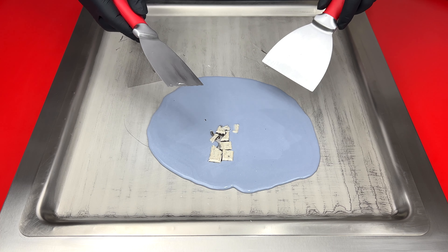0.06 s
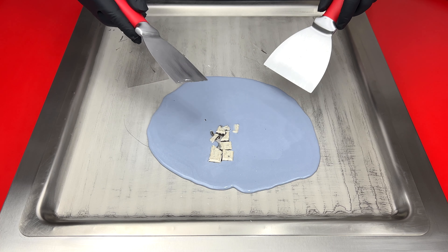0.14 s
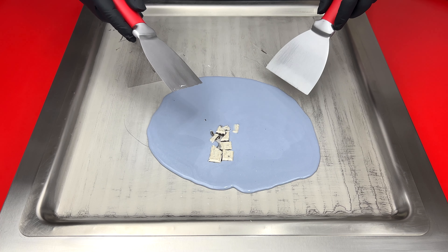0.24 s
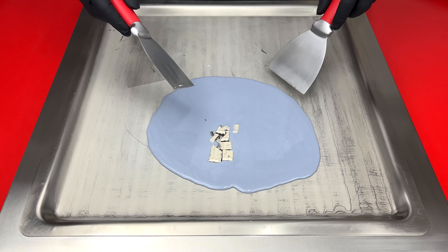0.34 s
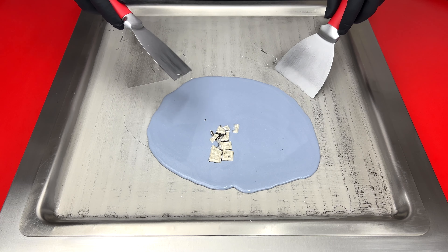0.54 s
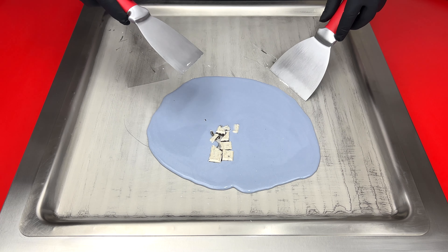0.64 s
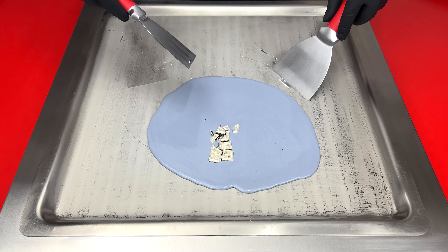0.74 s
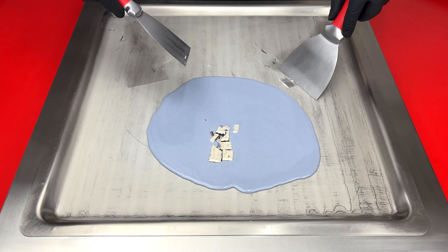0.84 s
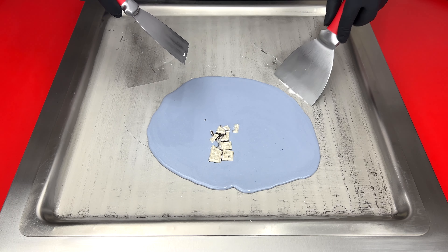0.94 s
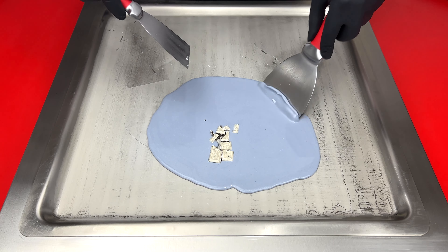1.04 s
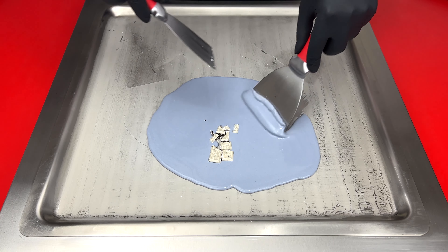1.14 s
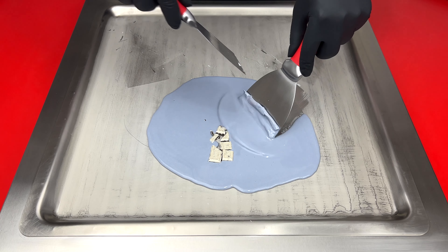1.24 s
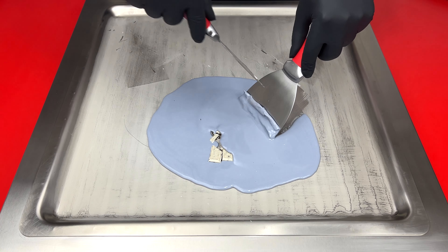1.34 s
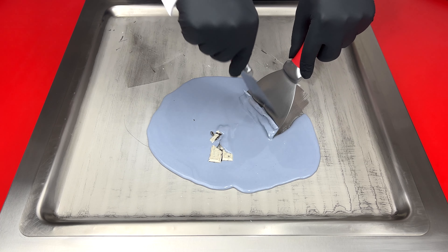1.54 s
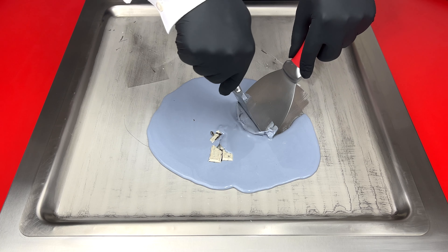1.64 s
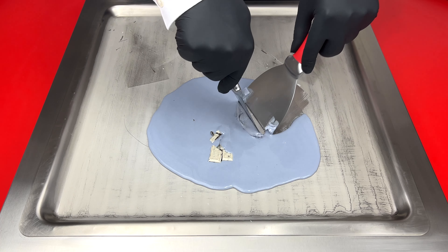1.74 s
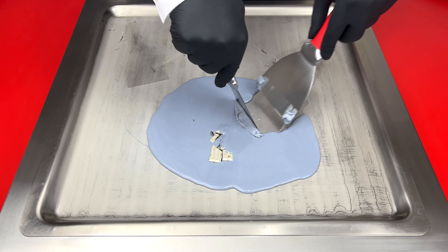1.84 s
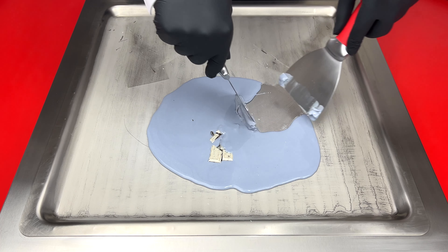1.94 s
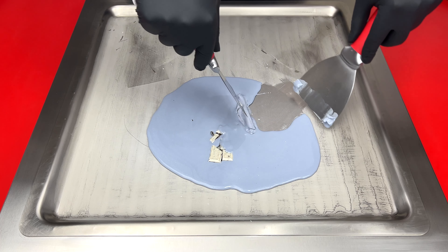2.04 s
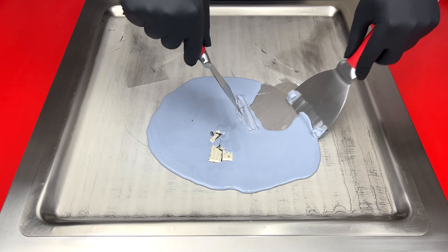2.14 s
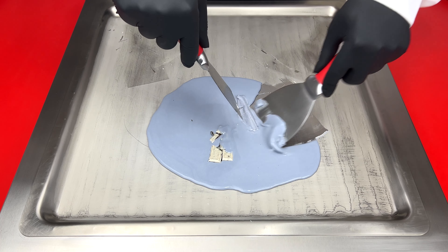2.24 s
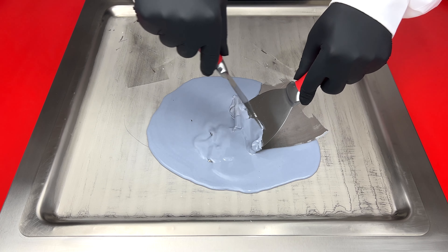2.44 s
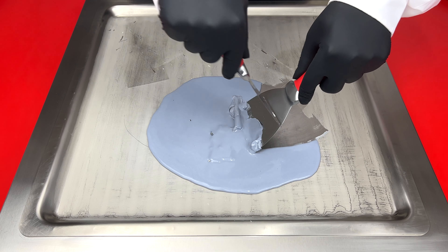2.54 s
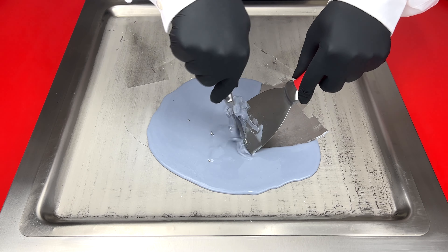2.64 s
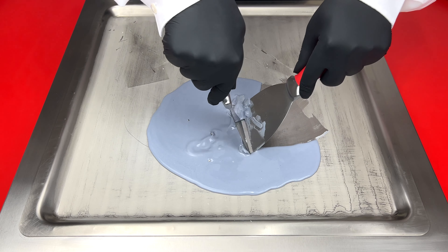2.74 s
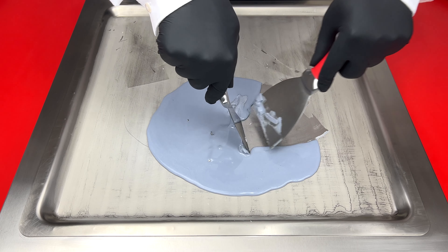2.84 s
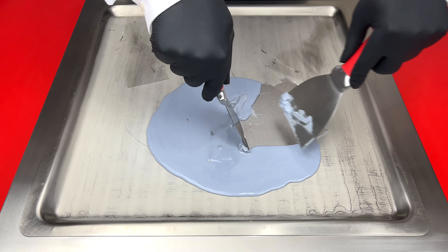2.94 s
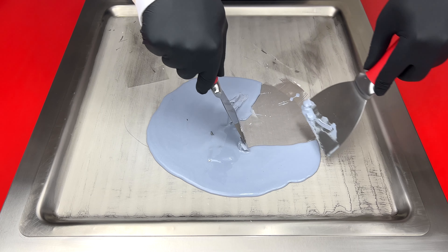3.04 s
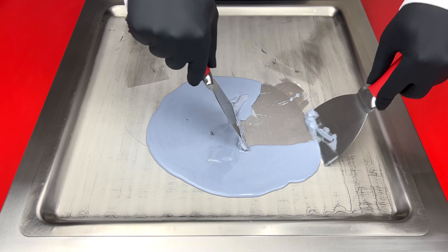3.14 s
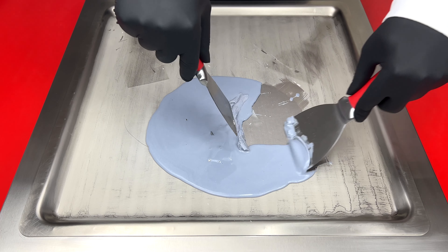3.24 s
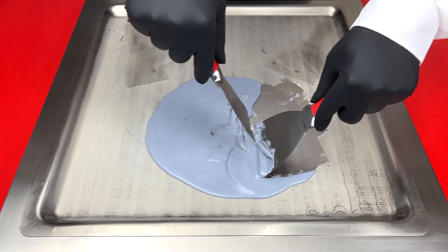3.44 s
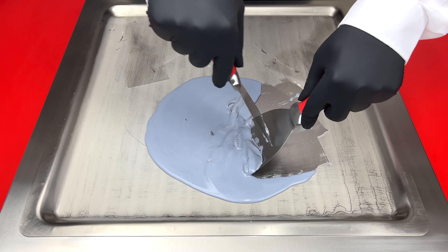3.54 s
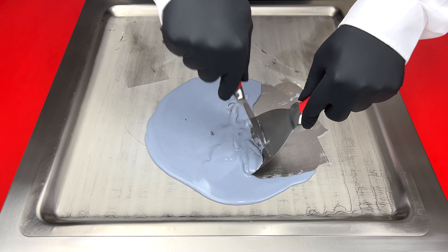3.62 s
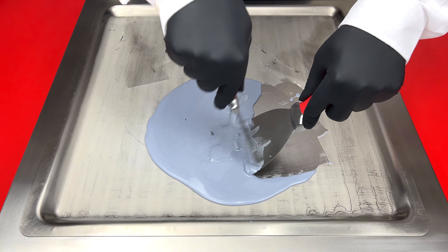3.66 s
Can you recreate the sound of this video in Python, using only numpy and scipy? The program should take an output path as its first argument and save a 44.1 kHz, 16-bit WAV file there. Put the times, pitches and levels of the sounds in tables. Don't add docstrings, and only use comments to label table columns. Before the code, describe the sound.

Two steel spatulas work on a frozen metal plate. Soft taps and thin icy scrapes come first, then hard, irregular chops crack and knock the plate, leaving blades ringing briefly. A dull cabinet thump comes early, and bright blade-on-blade clinks come later. After a pause, a last tap and scrape. A fan roar, throbbing low hum and faint whine run throughout. Close stereo microphone, indoors.

```python
import sys
import numpy as np
from scipy import signal
from scipy.fft import rfft, irfft
from scipy.io import wavfile
from scipy.ndimage import uniform_filter1d

SR = 44100
rng = np.random.default_rng(int(sys.argv[2]) if len(sys.argv) > 2 else 0)


def voltage_ratio(level):
    return 10 ** (np.asarray(level, float) / 20)


def master_out(mix):
    frames = np.transpose(np.atleast_2d(mix))
    ceiling = np.clip(frames, -1, 1)
    pcm = np.round(ceiling * 32767).astype(np.int16)
    wavfile.write(sys.argv[1], SR, pcm)


N = 373086
LAG_SAMPLES = 11


def on_hz(table, hz):
    f, v = np.transpose(table)
    return np.interp(np.log(np.maximum(hz, 1)), np.log(f), v)


def unit(x):
    return x / np.sqrt(np.mean(x ** 2))


def colour(x, table):
    n = x.shape[-1]
    gain = voltage_ratio(on_hz(table, np.fft.rfftfreq(n, 1 / SR)))
    return irfft(rfft(x) * gain, n)


def streaked(x, depth_db, width_hz):
    n = x.shape[-1]
    k = int(width_hz * n / SR)
    steps = np.repeat(rng.standard_normal(n // 2 // k + 1), k)
    ridges = uniform_filter1d(steps, k)[:n // 2 + 1]
    return unit(irfft(rfft(x) * voltage_ratio(depth_db * ridges), n))


def walk(rate):
    k = int(SR / rate)
    return uniform_filter1d(np.repeat(rng.standard_normal(N // k + 1), k), k)[:N]


def later(hz):
    return hz * LAG_SAMPLES / SR


def two_sided(mid, side, alike):
    alike = np.clip(alike, -.99, .99)
    return np.sqrt(1 + alike) * mid + np.sqrt(1 - alike) * side * np.array([[1], [-1]])


def add_at(out, start_s, sound):
    i = int(start_s * SR)
    room = out[:, i:i + sound.shape[1]]
    room += sound[:, :room.shape[1]]


# pitch_hz, level_db
HISS = [(7000, -13.5), (8800, -6.5), (9800, -2.5), (10800, -3), (11800, -3.5), (12800, -10.5), (14500, -6),
        (16500, -10)]
# pitch_hz, level_db
RASP = [(900, -6.5), (1500, 3.5), (2500, -1.5), (3500, -5), (4700, -4), (5200, -2), (5800, -0.5),
        (6400, -1), (7700, -8.5), (9000, -11.5), (10000, -47)]
# pitch_hz, level_db
THUD = [(150, -20), (300, -20), (900, 13), (2000, -2.5), (3500, 0), (5000, -30)]


def blow(peak_db, knock_hz, knock_db, bright_db, rattle_db):
    t = np.arange(8192) / SR
    rise = 1 - np.exp(-t / (.0004 + .0006 * np.clip(-21 - knock_db, 0, 5)))
    noise = rng.standard_normal((8, len(t)))
    chatter = voltage_ratio(3.2 * unit(uniform_filter1d(noise[7], int(0.0015 * SR))))

    crack = np.exp(-t / 0.0046)
    rattle = voltage_ratio(rattle_db) * chatter * np.exp(-t / 0.028)
    body = streaked(colour(0.83 * noise[0] + noise[1:3], RASP), depth_db=3.5, width_hz=220)
    body = body * (crack + rattle)

    edge_fade = np.exp(-t / .0016) + voltage_ratio(rattle_db - 3) * np.exp(-t / .009)
    edge = unit(colour(noise[3], HISS)) * edge_fade

    thud = unit(colour(noise[4:6], THUD)) * np.exp(-t / 0.025)
    phase = np.array([[0], [.4 * noise[6, 0] - 2 * np.pi * later(knock_hz)]])
    knock = np.sqrt(chatter) * np.sin(2 * np.pi * knock_hz * t + phase) * np.exp(-t / .012)
    sing_db = min(peak_db + knock_db + 17, 0)
    plate = voltage_ratio(knock_db + 3) * (voltage_ratio(sing_db) * knock + voltage_ratio(-8) * thud)
    return voltage_ratio(peak_db) * rise * (voltage_ratio(-6.5) * body + voltage_ratio(bright_db + 10) * edge + plate)


# start_s, peak_db, knock_hz, knock_db, edge_brightness_db
CHOPS = [(1.5166, -12, 1860, -7.5, -11.5), (1.6277, -16.5, 2050, -5.5, -31), (2.58, -5, 1490, -16, -17),
         (3.6798, -11.5, 1780, -12, -17), (4.1161, -9, 1740, -15.5, -18), (4.5469, -8, 1570, -22, -11),
         (4.6205, -16, 1630, -6.5, -14), (4.9842, -6, 1710, -4, -8), (5.389, -5, 1940, -16, -12.5),
         (5.3961, -10, 1716, -7, -22), (5.757, -13, 1690, -9, -12.5), (6.0699, -6.5, 1390, -13.5, -13),
         (6.6839, -6, 1590, -13.5, -5.5), (6.6974, -7.5, 1667, -7.5, -11)]
# start_s, peak_db, knock_db, edge_brightness_db
TAPS = [
    (0.2683, -21, -6, -23),
    (0.5312, -23, -6, -19),
    (2.1165, -16, -9, -19),
    (2.663, -23.5, 1.5, -15),
    (2.6916, -16, -5.5, -20),
    (3.1665, -13.5, -22, -17),
    (3.66, -31, -12, -17),
    (3.7324, -20.5, -15, -19),
    (4.6823, -20, -4, -13),
    (8.101, -19, -19, -14),
]
# start_s, peak_db, knock_db, edge_brightness_db
GLANCES = [
    (5.0692, -14.5, -5.5, -14),
    (5.4829, -29.5, 2, -10.5),
    (5.8452, -14.5, -35, -0.5),
    (6.158, -27.5, 2, -2.5),
    (6.753, -27.5, -13, -0.5),
    (8.216, -17, -29, -0.5),
]


def blows():
    tap_hz, chop_rattle_db, tap_rattle_db, glance_rattle_db = 1535, -9, -5.5, -3
    out = np.zeros((2, N))
    for start_s, *how in CHOPS:
        add_at(out, start_s, blow(*how, chop_rattle_db))
    for table, rattle_db in ((TAPS, tap_rattle_db), (GLANCES, glance_rattle_db)):
        for start_s, peak_db, knock_db, bright_db in table:
            add_at(out, start_s, blow(peak_db, tap_hz, knock_db, bright_db, rattle_db))
    return out


def ring(hz, db, t60, rise_s):
    t = np.arange(12288) / SR
    flutter = np.repeat(rng.standard_normal((len(hz), 48)), 256, axis=1)
    flutter_db = 3 * uniform_filter1d(np.minimum(flutter, 1), 256)
    fade = (1 - np.exp(-t / rise_s)) * voltage_ratio(db - 60 * t / t60 + flutter_db)
    left = rng.random((len(hz), 1))
    right = left + .25 * rng.random((len(hz), 1)) - later(hz)
    start = np.stack([left, right])
    return np.sum(fade * np.sin(2 * np.pi * (hz * t + start)), axis=1)


# pitch_hz, level_db, t60_s
BLADE = [(2550, -15, 0.1), (3040, -27, 0.17), (3870, -23.5, 0.093), (4750, -23, 0.077), (5300, -26, 0.18),
         (5600, -17.5, .07), (6200, -24.5, 0.15), (7000, -30, 0.24), (7450, -26.5, .1), (8370, -26, 0.068),
         (10800, -23, .1), (11300, -19.5, 0.11), (13700, -25, .07), (15300, -27, 0.074)]
# start_s, level_db, pitch_shift_percent, favoured_hz, ring_length_factor
RINGS = [(1.515, -2, 0.5, 5600, 0.61), (1.6277, -33, 2.5, 5300, 3), (2.581, -11, 1.5, 5300, 1.3),
         (4.547, -5, 1.2, 4750, 0.83), (4.9846, -5, -2, 2550, 0.59), (4.9845, 0, 0.2, 7000, .7),
         (5.389, -4, 7.5, 2550, 1.16), (5.3875, -7, -0.5, 5300, 1.1), (5.4829, -18.5, 0, 11300, 1.7),
         (5.7573, -1.5, 1, 3870, .5), (5.8473, -3, 3, 5600, .9), (5.8468, -1.5, 0.5, 7000, 1),
         (6.07, -6, -1, 2550, 0.87), (6.0698, -5, -3, 5600, 0.71), (6.158, -4, -.4, 10800, 0.66),
         (6.6832, -1, 0, 5600, .9), (6.6843, 0, -1, 11300, .6), (8.101, -9, .8, 5600, 0.91),
         (8.115, -17, 3, 2550, 2.2), (8.217, -8, 0.3, 5600, 1.5), (8.2172, -2.5, -1, 11300, 1.3)]
# start_s, pitch_hz, level_db, t60_s
LINGER = [(1.5155, 2900, -27, .14), (1.6277, 3560, -28, .05), (4.9833, 1770, -20, .15),
          (4.9842, 4100, -22, .12), (5.389, 3980, -23, .12), (5.483, 7450, -41, .2),
          (5.757, 1690, -23, .15), (5.7573, 3870, -16, 0.033), (5.8483, 4850, -17, .08),
          (2.581, 970, -20, 0.1), (6.6842, 1630, -16, .2), (6.6842, 1514, -18, .2),
          (8.218, 3200, -35.5, 0.54), (8.218, 3480, -35, 0.49), (8.218, 3800, -40, .25),
          (8.2172, 4732, -31, .35), (8.2172, 15300, -24, .1)]


def blade_rings():
    rise_s, favour_db_per_octave2, scatter_db, favourite_db = 0.00046, 12.5, 2.5, 4
    out = np.zeros((2, N))
    hz, mode_db, t60 = np.transpose(BLADE)[:, :, None]
    for start_s, db, shift, near_hz, longer in RINGS:
        share_db = scatter_db * rng.standard_normal(hz.shape)
        share_db -= favour_db_per_octave2 * np.log2(hz / near_hz) ** 2
        share_db[np.argmin(np.abs(hz - near_hz))] = favourite_db
        modes = ring(hz * (1 + shift / 100), mode_db + db + share_db, t60 * longer, rise_s)
        add_at(out, start_s, modes)
    for start_s, *mode in LINGER:
        add_at(out, start_s, ring(*np.reshape(mode, (3, 1, 1)), rise_s))
    return out


# start_s, level_db, t60_s, rise_s, lowest_hz
CLINKS = [
    (5.483, -52, .08, .001, 8000),
    (5.845, -25.5, 0.095, 0.0036, 3650),
    (6.159, -40, 0.23, .001, 5560),
    (6.685, -19.5, .12, 0.0028, 2630),
    (8.216, -34.5, 0.27, 0.0093, 5190),
]


def clinks():
    out = np.zeros((2, N))
    for start_s, db, t60, rise_s, low_hz in CLINKS:
        place, size, life = rng.random((3, 28, 1))
        hz = low_hz + (15600 - low_hz) * place ** 1.7
        mode_t60 = t60 * (.5 + life) * (1.2 - 0.82 * place)
        add_at(out, start_s, ring(hz, db - 8 * size, mode_t60, rise_s))
    return out


# touch_s, full_pressure_s, lift_s, hiss_db, rasp_db (over hiss)
STROKES = [(0.76, 0.797, 0.855, -47, 0.5), (0.967, 1.0, 1.066, -43, 2), (1.092, 1.16, 1.2, -45.5, 7),
           (1.547, 1.588, 1.64, -46, -3), (2.143, 2.21, 2.31, -37.5, -2), (3.17, 3.235, 3.44, -37.5, -4),
           (3.462, 3.506, 3.53, -45, 0), (3.765, 3.77, 3.79, -54, -3), (4.117, 4.19, 4.32, -33, -7),
           (4.59, 4.617, 4.54, -38, 1.5), (5.775, 5.794, 5.84, -49.5, 2), (8.177, 8.204, 8.3, -44.5, -6)]
# start_s, held_s, hiss_db, rasp_db (over hiss)
SKIDS = [(0.275, .005, -58.5, 17.5), (0.54, 0.012, -46.5, 2), (0.58, 0.12, -56, 3), (1.53, .015, -44.5, 8),
         (2.122, 0.026, -64, 0), (2.6, 0.092, -45.5, 0), (3.69, 0.031, -40.5, -4), (4.565, .005, -42, -2),
         (4.635, 0.047, -48.5, 8), (4.75, 0.018, -54, 1.5), (4.998, 0.013, -43.5, 5),
         (5.04, 0.034, -52.5, 0), (5.41, .005, -42.5, 5), (6.085, .025, -45, -1), (6.705, .004, -36.5, 5.5),
         (6.735, .02, -52, -1.5), (8.108, 0.02, -40.5, 2.5)]


def slides():
    touch_s, touch_db, sag_db_per_s, lift_db_per_s = .006, -9, 26, 274
    t = np.arange(N) / SR
    hiss, rasp = np.zeros(N), np.zeros(N)
    skids = [(s, s, s + held, *db) for s, held, *db in SKIDS]
    for start, full, lift, hiss_db, rasp_db in STROKES + skids:
        build_db = touch_db * np.clip((full - t) / max(full - start, touch_s), 0, 1)
        ease_db = -sag_db_per_s * np.maximum(t - full, 0) - lift_db_per_s * np.maximum(t - lift, 0)
        touch = np.clip((t - start) / touch_s + 1, 0, 1)
        hiss += touch * voltage_ratio(hiss_db + build_db + ease_db + 6.5)
        rasp += touch * voltage_ratio(hiss_db + rasp_db + 0.46 * build_db + 0.82 * ease_db + 9)
    grip = voltage_ratio(1.2 * walk(200) + .4 * walk(25))
    grains = rng.standard_normal((3, N)) * voltage_ratio(2.2 * rng.exponential(size=N)) * grip
    bright = streaked(colour(grains[0], HISS), depth_db=2, width_hz=150)
    dull = streaked(colour(0.24 * grains[0] + grains[1:], RASP), depth_db=4, width_hz=80)
    return hiss * bright + rasp * dull


def thump():
    start_s, panel_hz, level_db, rise_s, t60_s, crackle_db = 2.692, 178, -12.5, 0.021, 0.32, -5
    t = np.maximum(np.arange(N) / SR - start_s, 0)
    crackle_colour = [(120, -16), (250, 12), (700, 13), (1500, -26.5)]  # (Hz, dB)
    crackle = unit(colour(rng.standard_normal((2, N)), crackle_colour))
    panel = (np.exp(-t / rise_s) - 1) * np.sin(2 * np.pi * panel_hz * t)
    return voltage_ratio(level_db - 60 * t / t60_s) * (panel + voltage_ratio(crackle_db) * (t > 0) * crackle)


# time_s, level_db
HUM = [(0.0, -34.5), (4.6, -33), (5.1, -40), (7.6, -36), (8.46, -38)]


def drone():
    hum_hz, in_step_s = 58.55, .16
    t = np.arange(N) / SR
    hum_db = np.interp(t, *np.transpose(HUM)) + 1.5 * walk(4.4)
    out = voltage_ratio(hum_db) * np.cos(2 * np.pi * (hum_hz * t + 0.26 * walk(3) + [[0], [.04]]))
    # (Hz, dB, fade dB per s)
    for hz, db, fade in [(178.6, -25, 0.4), (175.49, -28.5, .9), (169.75, -33.5, -0.05)]:
        turn = 2 * np.pi * (hz * (t - in_step_s) + .03 * walk(1.3))
        out = out + voltage_ratio(db - fade * t + walk(1.5)) * np.cos(turn)
    return np.sqrt(2) * out


def resonance(hz, width_hz, alike):
    f = np.fft.rfftfreq(N, 1 / SR)
    peak = 1 + (2 * (f - hz) / width_hz) ** 2
    mid, side = irfft(rfft(rng.standard_normal((2, N))) / peak, N)
    return unit(two_sided(mid, side, alike))


def booms():
    f = np.fft.rfftfreq(N, 1 / SR)
    out = np.zeros((2, N))
    for hz, width_hz, db in [(176.4, 9, -35), (128.5, 23, -26)]:
        boom = voltage_ratio(db) * resonance(hz, width_hz, 0.95)
        out += irfft(rfft(boom) / np.sqrt(1 + ((f - hz) / (0.83 * width_hz)) ** 6), N)
    return out


# pitch_hz, level_db
WHINE = [(4269, -58), (4328, -56)]
# start_s, end_s, pitch_hz, level_db
PASSING_WHINE = [
    (.2, 1.5, 5100, -56),
    (1.3, 3.2, 5450, -53),
    (2.8, 3.3, 5270, -56),
]


def whines():
    t = np.arange(N) / SR
    out = np.zeros((2, N))
    steady = [(-1, 10, hz, db + 2) for hz, db in WHINE]
    for start_s, end_s, hz, db in steady + PASSING_WHINE:
        lag = np.array([[0], [later(hz)]])
        turn = 2 * np.pi * (hz * t + .3 * walk(5) + rng.random() - lag)
        on = np.interp(t, [start_s - .1, start_s, end_s, end_s + .1], [0, 1, 1, 0])
        out += on * np.sqrt(2) * voltage_ratio(db + 2.2 * walk(4)) * np.sin(turn)
    return out


# pitch_hz, level_db_per_hz
ROAR = [(30, -68), (60, -60), (200, -54), (500, -53), (950, -61), (1200, -60.5), (2000, -66.5),
        (3500, -74.5), (5200, -76), (7000, -82.5), (9000, -86), (11400, -95), (12600, -110), (13700, -100)]
# pitch_hz, likeness (-1 to 1)
ROAR_ALIKE = [(60, 1), (150, 0.67), (290, 0.48), (640, -0.21), (1400, 0.21), (3000, -0.054), (9000, -0.12)]
# pitch_hz, width_hz, level_db
CABINET = [(83.1, 4.5, -42.5), (234.6, 9.1, -35.5), (268.3, 16, -34.5), (306.2, 18.8, -28.5),
           (340.2, 9.8, -36.5), (445, 47, -34), (547, 73, -37), (674, 78, -36.5), (838, 23.6, -36),
           (938, 89, -36)]
# pitch_hz, width_hz, level_db
WHISTLE = [(4300, 200, -52.5), (8400, 120, -68), (11450, 300, -69)]


def fridge():
    f = np.fft.rfftfreq(N, 1 / SR)
    mid, side = rfft(rng.standard_normal((2, N))) * voltage_ratio(on_hz(ROAR, f)) * np.sqrt(SR / 4)
    out = irfft(two_sided(mid, side, on_hz(ROAR_ALIKE, f)), N) * voltage_ratio(0.51 * walk(2.78))
    for hz, width_hz, db in CABINET + WHISTLE:
        out += voltage_ratio(db) * resonance(hz, width_hz, on_hz(ROAR_ALIKE, hz))
    return out + drone() + booms() + whines()


# pitch_hz, left_minus_right_db
SIDES = [(60, 1), (200, -1.5), (380, 6), (700, -1), (1300, 4), (2400, 1.5), (4400, 4.5), (5500, 13),
         (7000, 7), (8800, 3.5)]


def scene():
    shade_db = on_hz(SIDES, np.fft.rfftfreq(N, 1 / SR)) * np.array([[0], [-1]])
    spatulas = blows() + blade_rings() + clinks() + slides() + thump()
    return irfft(rfft(spatulas) * voltage_ratio(0.56 * shade_db) + rfft(fridge()) * voltage_ratio(shade_db), N)


def low_pass(x):
    return signal.sosfilt(signal.butter(12, 17150, fs=SR, output="sos"), x)


def record(dry):
    top_hz, fold_hz = 15850, 8900
    f = np.fft.rfftfreq(N, 1 / SR)
    rounded = np.tanh(1.117 * dry) / 1.072
    top_cut_db = np.interp(f, [top_hz, top_hz + 50, top_hz + 1100], [0, -18, -45])
    spectrum = rfft(rounded) * voltage_ratio(top_cut_db)
    spectrum[1, f > fold_hz] = spectrum[0, f > fold_hz]
    left, right = irfft(spectrum, N)
    mix = np.array([np.roll(left, LAG_SAMPLES), right])
    return low_pass(mix)


dry = scene()
out = record(dry)
master_out(out)
```